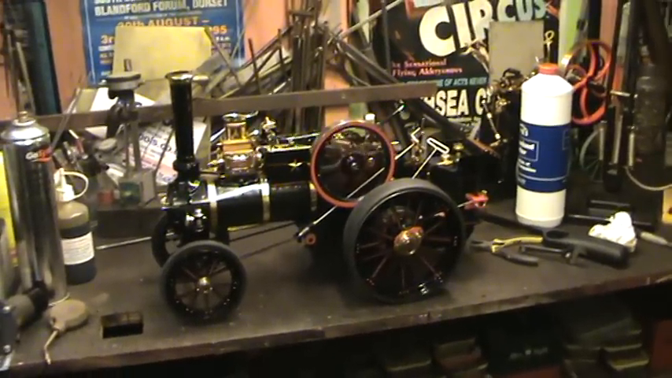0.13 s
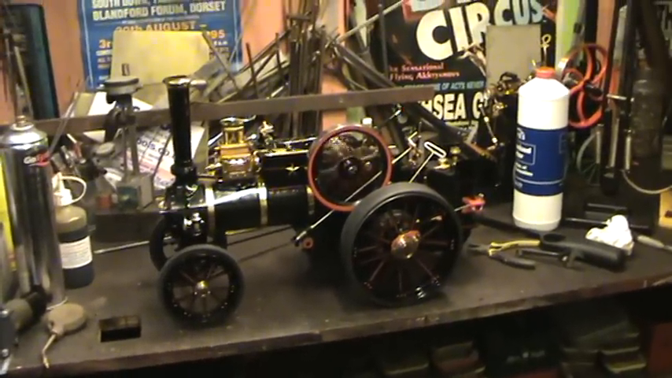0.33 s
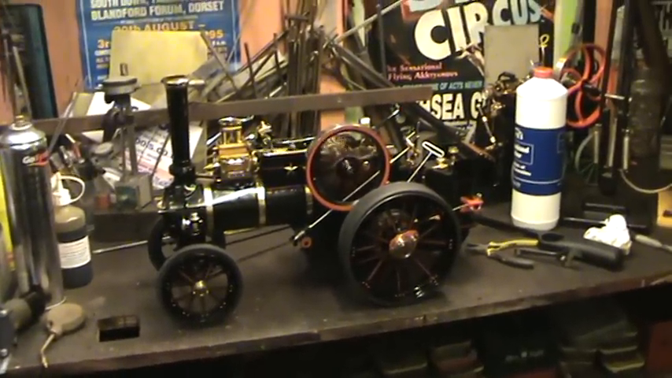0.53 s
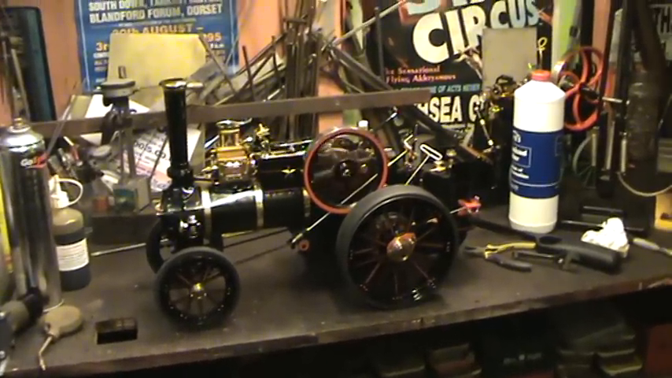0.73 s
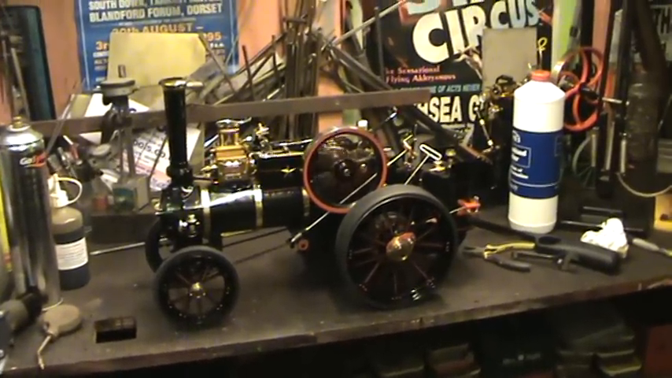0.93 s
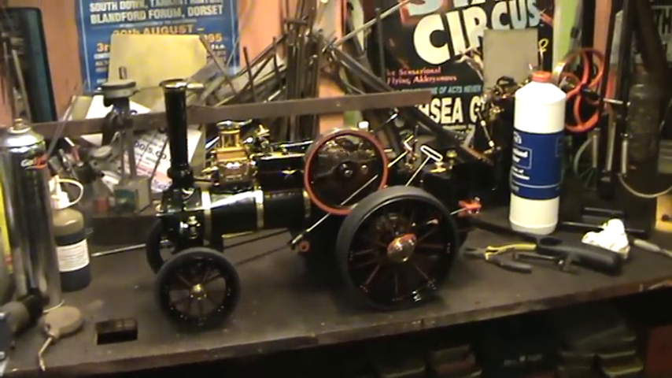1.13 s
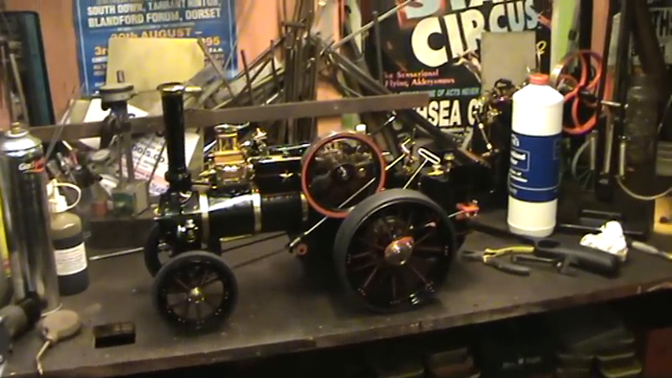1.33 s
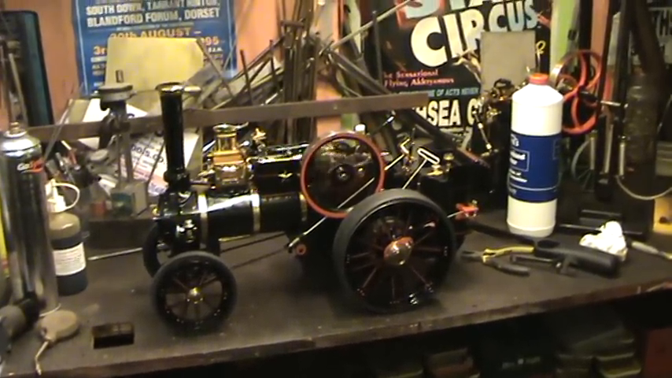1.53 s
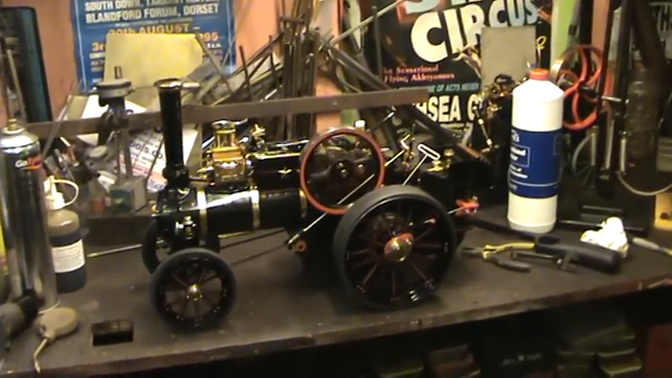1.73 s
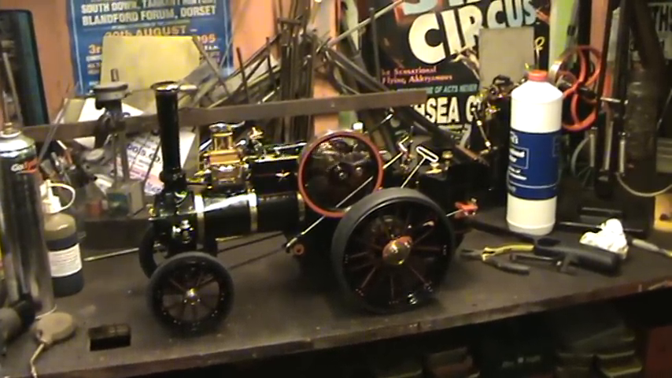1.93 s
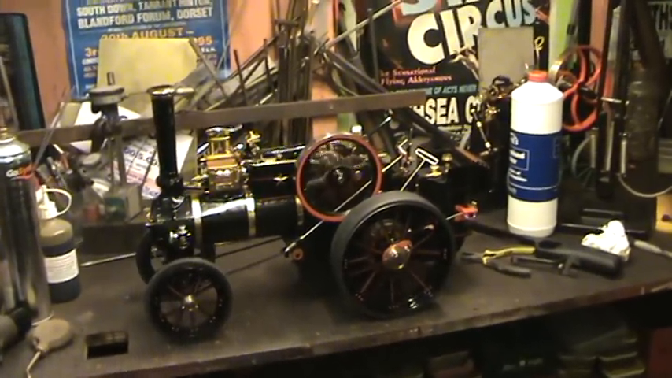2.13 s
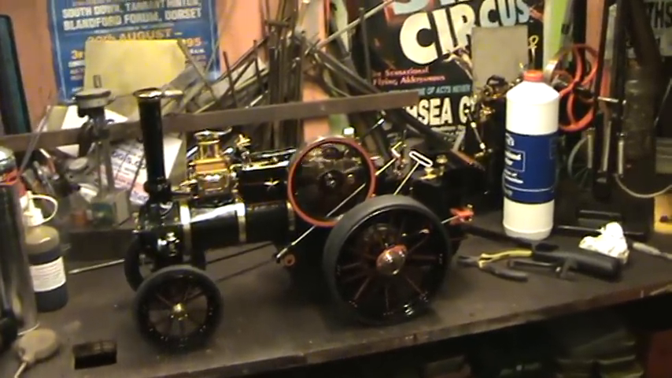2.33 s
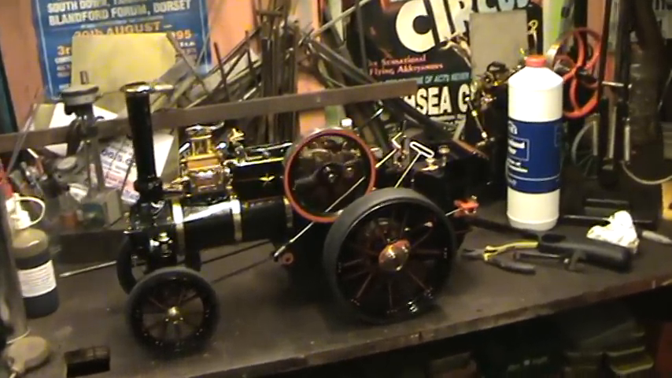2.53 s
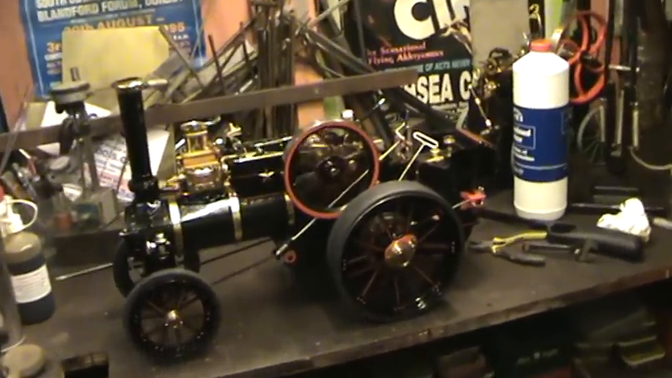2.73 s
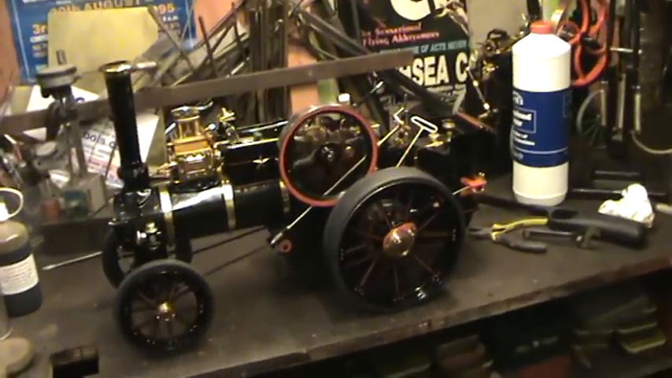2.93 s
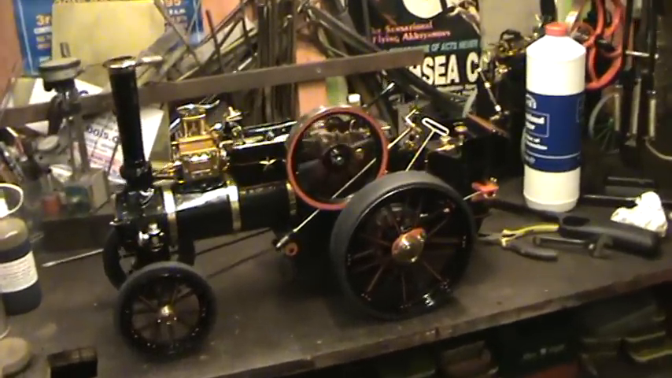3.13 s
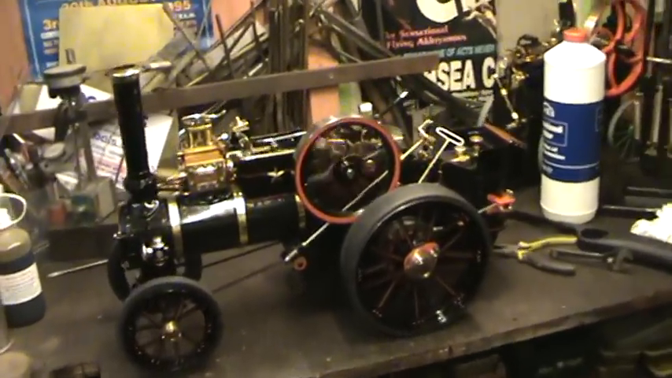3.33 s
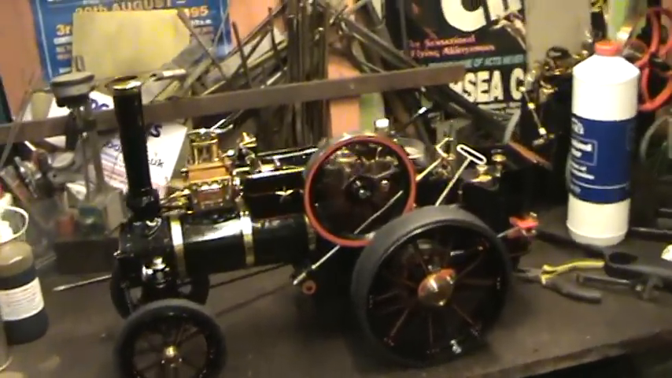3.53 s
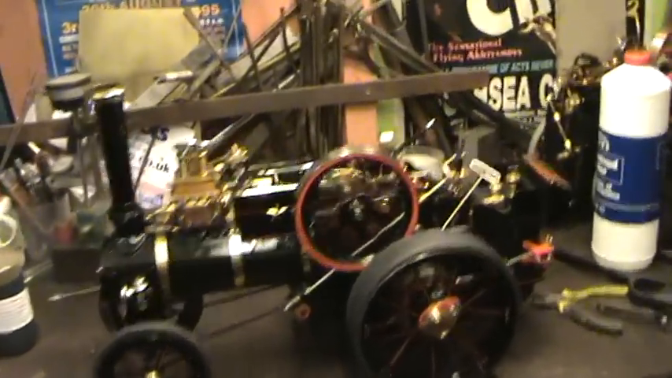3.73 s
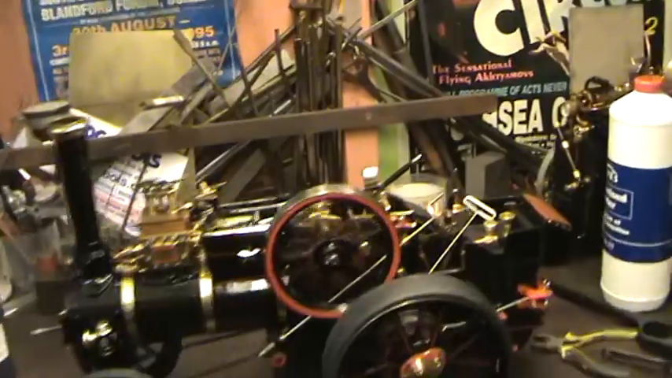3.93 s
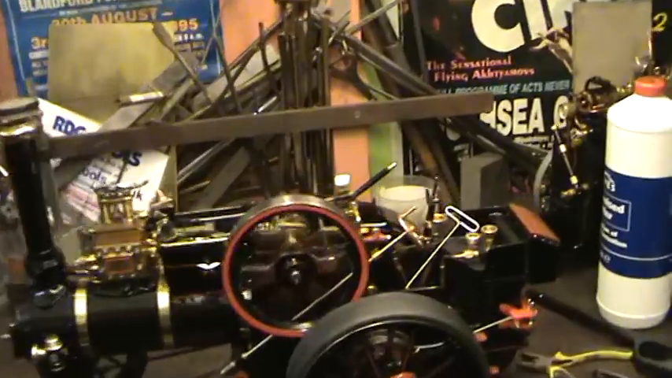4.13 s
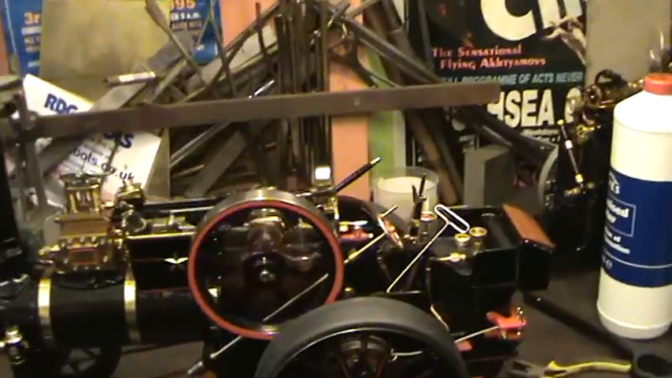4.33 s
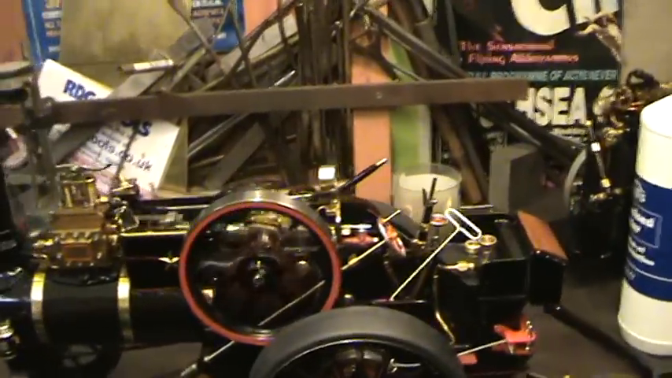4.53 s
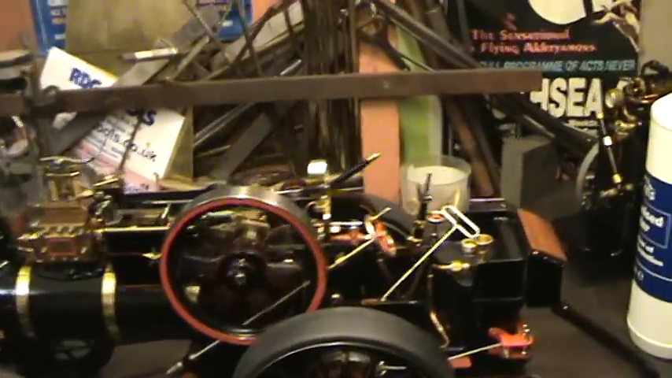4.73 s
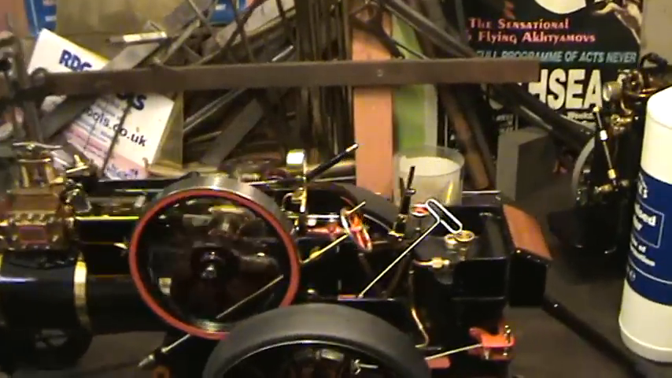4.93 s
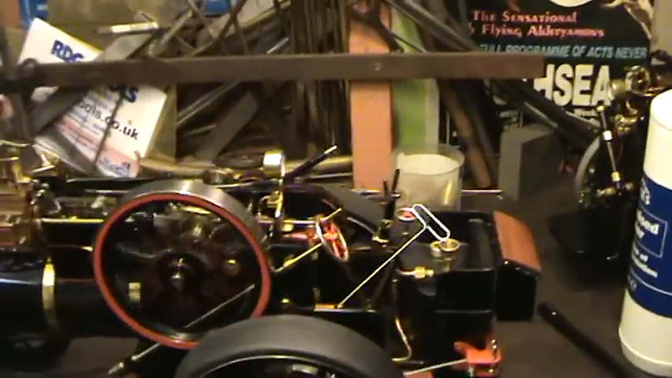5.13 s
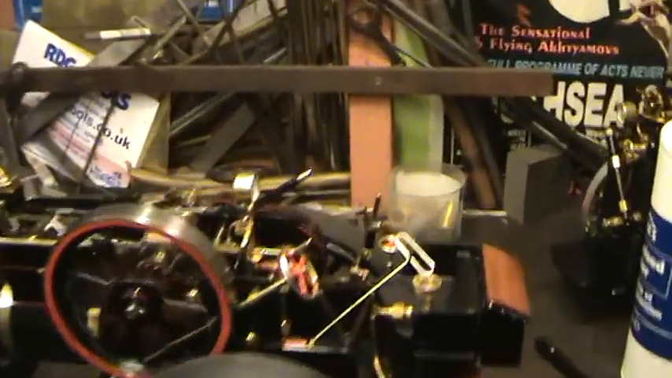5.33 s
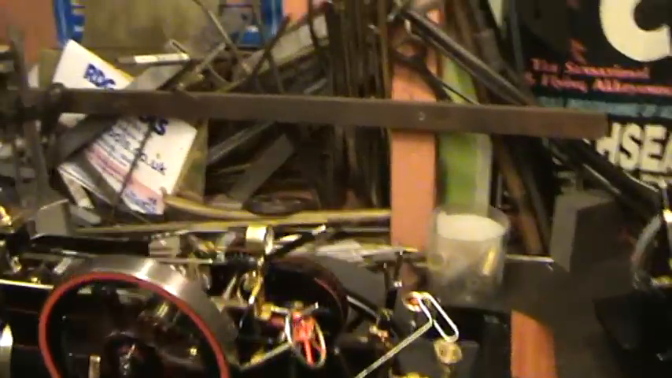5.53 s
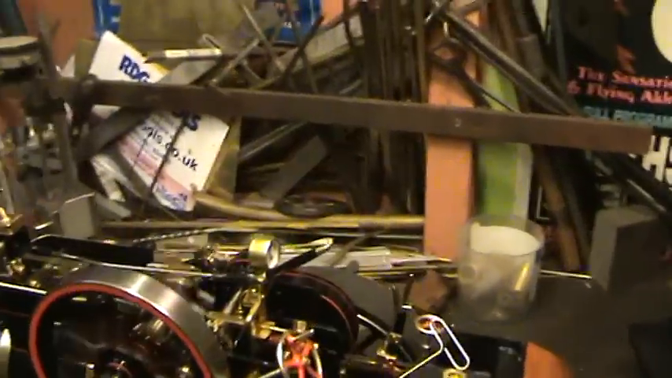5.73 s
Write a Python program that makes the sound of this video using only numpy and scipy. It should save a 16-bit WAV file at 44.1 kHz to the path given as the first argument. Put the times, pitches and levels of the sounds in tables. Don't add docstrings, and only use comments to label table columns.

```python
import sys
import numpy as np
from scipy import signal
from scipy.fft import rfft, irfft, next_fast_len
from scipy.io import wavfile
from scipy.ndimage import uniform_filter1d

SR = 44100
rng = np.random.default_rng(int(sys.argv[2]) if len(sys.argv) > 2 else 0)


def how_loud(loudness_db):
    steps = np.asarray(loudness_db, float) / 20
    return 10 ** steps


def file_out(sig):
    cols = np.atleast_2d(sig).T
    lim = np.clip(cols, -1, 1)
    pcm = np.round(lim * 32767).astype(np.int16)
    wavfile.write(sys.argv[1], SR, pcm)


N = 254456

# (time [s], speed [turns/s])
SPEED = [(0, 6.1223), (.9, 6.2008), (1.25, 6.0893), (1.9, 6.2697), (2.7, 6.2161), (3.5, 6.3336),
         (4.1, 6.2026), (4.6, 5.9887), (5.77, 6.2298)]
FIRST_BEAT_TURN, RETURN_BEAT_TURN = .0067, .474
STROKES = {"bench": (-44.5, -45.5, 3.5, 3.5, 2, 0.1), "chimney": (-30.5, -36, 12.5, 15, 1, 0.4),
           "puff": (-36.5, -30.5, -2, -3.5, 1.5, 2.3), "knock": (-37.5, -33, 10.5, 7, 0.66, 0.5),
           "boiler": (-47.5, -45.5, 6, 4, 11.5, 1.3)}

# (time [s], distance walked [m])
WALK = [
    (0, 0),
    (2.0, .004),
    (2.5, .06),
    (3.4, .2),
    (4.3, .55),
    (5.77, .8),
]
# (time [s], closeness [0-1], facing the boiler [0-1], gain in the high jet's beam [dB])
CAMERA = [(0, 0, 0, 0), (1.5, 0.27, 0.13, 0.2), (2.25, 0.36, 0.47, 0.1), (2.5, 0.53, 0.57, 0.6),
          (3.3, 0.57, 1, 0.7), (3.7, 0.69, 0.6, 0.1), (3.95, 0.7, 0.9, 0.5), (4.4, 0.76, 0.86, -1.1),
          (4.8, 0.94, 0.54, -0.4), (5.2, 0.83, 0.2, 0), (5.77, 0.9, 0.6, 1)]

# (frequency [Hz], delay [s], rise [s], T60 [s], level [dB])
BENCH_MODES = [(120.7, 0.0038, 0.0045, 0.12, 4), (94.5, 0.0034, 0.0089, 0.079, -7),
               (148, 0.0083, 0.0058, 0.28, -12)]
BENCH_NEAR_MODES = [(126, -.006, 0.0052, 0.061, 6.7), (88.5, -0.0038, 0.0057, 0.059, 6.1)]
CHIMNEY_MODES = [(331, -.004, 0.013, 0.125, 3), (245, -.002, 0.0079, 0.06, -12)]
CHIMNEY_NEAR_MODES = [(321.5, -.001, 0.0067, 0.039, 9), (242, -0.00086, 0.0042, 0.016, -10),
                      (324, .010, 0.0041, 0.06, -12.5)]
PUFF_MODES = [(340.2, 0.017, 0.018, 0.15, -0.5), (246, 0.0222, 0.0088, 0.062, -4.5)]
PUFF_NEAR_MODES = [(325, 0.01783, .007, 0.055, 14), (333, .034, .007, 0.037, 6.5),
                   (250, .03, 0.011, 0.1, -1)]
KNOCK_MODES = [(773, 0.021, 0.004, 0.03, 2.5), (926, .028, 0.004, 0.055, -5.5),
               (762, 0.031, 0.009, 0.06, -8), (1357, .015, 0.005, 0.05, -8)]
KNOCK_NEAR_MODES = [(850, .020, .005, .028, 10), (780, .031, .004, .032, 6), (720, .036, .005, .04, -3),
                    (1500, .021, .004, .035, -2)]
BOILER_MODES = [(670, .016, 0.012, 0.33, -4), (609, .03, 0.0064, 0.1, -8)]

# (frequency [Hz], density [dB/Hz])
JET_SPECTRUM = [(4410, -10.5), (7500, -6), (8430, -6.5), (9290, 3), (9950, 3), (10700, -1.5), (13000, -19),
                (14200, -32)]
FLOW_SPECTRUM = [(1290, -63), (2200, -12.5), (2650, -5), (2950, -7), (3920, -2), (5080, -4), (5530, 0),
                 (8500, -5.5), (11000, -22), (18700, -120)]
# (frequency [Hz], density [dB/Hz])
LOWER_FAR_SPECTRUM = [(26, -36), (45, -14), (129, -11.5), (194, -12.5), (333, -1.5), (423, -12.5),
                      (704, -8), (939, -11), (1110, -20), (1340, -4), (1760, -10), (2600, -3.5),
                      (3380, -46), (5720, -120)]
LOWER_NEAR_SPECTRUM = [(26, -42), (45, -5), (114, -11), (184, -14), (322, -2), (484, -17), (753, -12),
                       (1080, -16.5), (1390, -11), (2600, -12), (3380, -24), (5720, -120)]
# (frequency [Hz], density [dB/Hz])
AIR_SPECTRUM = [(7650, -33), (13000, -17), (13700, -11), (15100, 9), (15700, 5)]
# (frequency [Hz], density [dB/Hz])
SIDES_SPECTRUM = [(240, -54), (400, -16.5), (759, -17), (1060, -15.5), (1380, -13), (1920, -20.5),
                  (2610, -9.5), (2950, -15), (3760, -8), (4880, -13.5), (5510, -11), (7590, -19),
                  (11100, 3), (12500, -5), (15300, -27)]
AIR_DB, SIDES_DB = -45.5, -31
# (from afar [dB], gain when close [dB])
JET_DB = (-26.5, 3)
FLOW_DB = (-29, 6)
LOWER_DB = (-41, 3)
# (frequency [Hz], width [Hz], far level [dB], near level [dB])
CAVITIES = [(4026, 100, -15, -19), (4413, 70, -9.5, -19), (5570, 360, -9, -10), (3885, 195, -16.5, -12),
            (5500, 190, -16, -17.5), (10500, 170, -6, -17), (9480, 75, -22.5, -19), (11770, 61, -20.5, -32),
            (9380, 140, -9, -18), (9760, 100, -10, -31)]
# (time [s], level [dB])
WHISTLE = [(0, -40.5), (1.9, -38), (2.45, -39.5), (2.9, -34), (3.58, -28.5), (3.7, -40), (4.2, -38),
           (4.6, -30), (5.05, -37.5), (5.3, -39), (5.77, -40.5)]
# (time [s], gain [dB])
SPURTS = [
    (.98, 6.6),
    (1.37, 10.2),
    (1.7, 3.5),
    (2.18, 7.1),
    (2.99, 6),
    (4.43, 6.2),
    (4.85, 8.1),
    (5.18, 17),
    (5.74, 9.4),
]
SPURT_S, WHISTLE_FAR_HZ, WHISTLE_NEAR_HZ = 0.024, 2700, 2631

# (centre [s], length [s], level [dB])
HUM = [(.13, .7, -41), (.66, 0.45, -40), (1.12, 0.44, -45.5), (1.55, 0.55, -44), (1.98, 0.18, -46),
       (2.3, .45, -48), (2.62, .45, -45), (3.25, .75, -48), (4.15, 0.46, -48), (4.52, 0.39, -51),
       (4.9, .4, -52), (5.35, .5, -49), (5.72, .25, -42)]
HUM_HZ, HUM_WIDTH_HZ = 62, 1.37

# (time [s], level [dB])
HANDS = [(0, -64), (2.0, -61), (2.9, -58), (3.4, -51), (3.75, -51), (4.3, -51), (4.8, -53), (5.5, -53),
         (5.7, -49), (5.77, -61)]
# (frequency [Hz], density [dB/Hz])
GRIP_SPECTRUM = [(70, -20), (160, -5), (300, -5), (700, -12), (1200, -25)]
# (time [s], frequency [Hz], level [dB])
CREAK = [
    (3.5, 660, -70),
    (3.6, 650, -52),
    (3.72, 630, -37),
    (3.85, 570, -41),
    (3.92, 560, -70),
]
# (centre [s], length [s], level [dB])
PLATE = [
    (2.55, 0.55, -46.5),
    (2.85, .18, -46),
    (3.68, .3, -41),
    (3.81, .13, -37),
    (4.05, .5, -47),
]
PLATE_HZ = 879.5

SHED_T60_S, SHED_DB, SHED_SIDE_DB = 0.15, -7.5, -20
NEAR_ECHO_LATE = 3.5

T = np.arange(N) / SR
NEAR = np.clip(np.interp(T, *np.transpose(WALK)) / .6, 0, 1)
MOVED = np.clip(NEAR / .13, 0, 1)


def curve(table, col):
    return np.interp(T, [row[0] for row in table], [row[col] for row in table])


def unit(x):
    return x / np.sqrt(np.mean(x ** 2))


def coloured(points):
    size = next_fast_len(N)
    hz = np.maximum(np.fft.rfftfreq(size, 1 / SR), 1)
    points_hz, points_db = np.transpose(points)
    db = np.interp(np.log(hz), np.log(points_hz), points_db, -120, -120)
    spectrum = rfft(rng.standard_normal(size)) * how_loud(db)
    return unit(irfft(spectrum, size)[:N])


def resonant(hz, width_hz):
    b, a = signal.iirpeak(hz, hz / width_hz, SR)
    once = signal.lfilter(b, a, rng.standard_normal(N))
    return unit(signal.lfilter(b, a, once))


def flicker(rate_hz, db):
    hold = int(SR / rate_hz)
    steps = np.repeat(rng.standard_normal(N // hold + 1), hold)
    smooth = uniform_filter1d(uniform_filter1d(steps, hold), hold)[:N]
    return how_loud(1.63 * db * smooth)


def surges(rows):
    return sum(how_loud(db) * np.cos(np.pi * np.clip((T - at) / length, -.5, .5)) for at, length, db in rows)


def blend(far, near, late=1):
    angle = NEAR ** late * np.pi / 2
    return np.cos(angle) * far + np.sin(angle) * near


def beats():
    turns = np.cumsum(np.interp(T, *np.transpose(SPEED))) / SR - FIRST_BEAT_TURN
    marks = (np.arange(int(turns[-1]) + 1)[:, None] + [0, RETURN_BEAT_TURN]).ravel()
    return np.searchsorted(turns, marks[marks < turns[-1]])


def strength(part):
    forward, back, forward_gain, back_gain, facing, scatter = STROKES[part]
    at = beats()
    is_back = np.arange(len(at)) % 2
    db = np.where(is_back, back, forward)
    db = db + np.where(is_back, back_gain, forward_gain) * curve(CAMERA, 1)[at]
    return db + facing * curve(CAMERA, 2)[at] + scatter * rng.standard_normal(len(at))


def strikes(db, shape):
    train = np.zeros(N)
    train[beats()] = how_loud(db)
    lead = SR // 20
    response = shape(np.arange(-lead, SR // 2) / SR)
    return signal.fftconvolve(train, response)[lead:lead + N]


def swell(t, delay_s, rise_s, t60_s):
    t = np.maximum(t - delay_s, 0)
    return (1 - np.exp(-(t / rise_s) ** 2)) * np.exp(-np.log(1000) * t / t60_s)


def ring(beat_db, modes):
    def shape(t):
        total = 0
        for hz, delay_s, rise_s, t60_s, db in modes:
            sine = np.sin(2 * np.pi * hz * (t - delay_s))
            total = total + how_loud(db) * swell(t, delay_s, rise_s, t60_s) * sine
        return total
    return strikes(beat_db, shape)


def burst(beat_db, delay_s, rise_s, t60_s, hz, width_hz):
    gate = strikes(beat_db, lambda t: swell(t, delay_s, rise_s, t60_s))
    return gate * resonant(hz, width_hz)


def bench_thump():
    db = strength("bench")
    return how_loud(6.5) * blend(ring(db, BENCH_MODES), ring(db, BENCH_NEAR_MODES))


def chimney_ring():
    db = strength("chimney")
    return how_loud(0.5) * blend(ring(db, CHIMNEY_MODES), ring(db, CHIMNEY_NEAR_MODES), NEAR_ECHO_LATE)


def exhaust_puff():
    db = strength("puff")
    tone = how_loud(1) * blend(ring(db, PUFF_MODES), ring(db, PUFF_NEAR_MODES), NEAR_ECHO_LATE)
    return tone + burst(db, .003, 0.011, 0.27, 326, 43) * how_loud(-14)


def valve_knock(db):
    knock = how_loud(4.0) * blend(ring(db, KNOCK_MODES), ring(db, KNOCK_NEAR_MODES))
    return knock + burst(db, 0.017, 0.0022, 0.16, 747, 540) * how_loud(-9)


def steam_spit(db):
    return burst(db, 0.014, 0.008, 0.12, 1710, 1900) * how_loud(.6)


def boiler_ring(db):
    return how_loud(2.0) * ring(db, BOILER_MODES) + burst(db, .015, .01, .2, 668, 40) * how_loud(-7)


def boiler_breath(db):
    return burst(db, 0.0013, 0.0048, 0.28, 1407, 170) * how_loud(-4.0)


def exhaust():
    knock_db, boiler_db = strength("knock"), strength("boiler")
    deep = bench_thump() + chimney_ring() + exhaust_puff()
    deep = deep + boiler_breath(boiler_db) + steam_spit(knock_db)
    gear = valve_knock(knock_db) + boiler_ring(boiler_db)
    return deep, gear


def leak_db(levels):
    return levels[0] + levels[1] * curve(CAMERA, 1)


def high_jet():
    db = leak_db(JET_DB) + 1.7 * curve(CAMERA, 3) + 0.14
    return coloured(JET_SPECTRUM) * how_loud(db) * flicker(12, 0.34) * flicker(4.2, .25)


def cavity_tones():
    total = 0
    for hz, width_hz, far_db, near_db in CAVITIES:
        level = how_loud(far_db + (near_db - far_db) * MOVED)
        total = total + level * resonant(hz, width_hz) * flicker(14, 1.5)
    return total


def low_leak(pressure):
    noise = blend(coloured(LOWER_FAR_SPECTRUM), coloured(LOWER_NEAR_SPECTRUM))
    return noise * how_loud(leak_db(LOWER_DB) - 1.0) * (1 + 1.05 * pressure)


def whistling_leak(pressure):
    tone = blend(resonant(WHISTLE_FAR_HZ, 78), resonant(WHISTLE_NEAR_HZ, 62)) * unit(0.043 + pressure)
    spurts_db = sum(db * np.exp(-((T - at) / SPURT_S) ** 2) for at, db in SPURTS)
    return tone * how_loud(curve(WHISTLE, 1) + spurts_db - 4.0) * flicker(12, 0.62)


def leaks():
    pressure = strikes(0, lambda t: swell(t, -0.019, 0.015, 0.2))
    flow = how_loud(leak_db(FLOW_DB) - 1.02) * flicker(16, 0.11) * flicker(8, 0.5)
    jets = high_jet() + coloured(FLOW_SPECTRUM) * flow
    pipes = cavity_tones() * unit(.7 + pressure) * flow
    air = coloured(AIR_SPECTRUM) * how_loud(AIR_DB)
    return jets, pipes + low_leak(pressure) + whistling_leak(pressure) + air


def echoes(x, longest_s, db, count):
    walked_m, out = curve(WALK, 1), 0
    for lag, slope, sign in rng.random((count, 3)):
        delay_s = longest_s * (.1 + lag) + walked_m * (slope - .5) / 343
        out = out + np.sign(sign - .5) * np.interp(T - delay_s, T, x, left=0)
    return out * how_loud(db) / np.sqrt(count)


def side_hiss():
    wide = coloured(SIDES_SPECTRUM) * how_loud(SIDES_DB + 5.5 * curve(CAMERA, 1) - 2.0)
    wide = wide + echoes(wide, .012, -11.0, count=4)
    return wide - 0.19 * uniform_filter1d(wide, size=5)


def shed(x, db):
    t = np.arange(SR // 2) / SR
    tail = rng.standard_normal(len(t)) * swell(t, 0.0021, 0.0019, SHED_T60_S)
    return how_loud(db) * signal.fftconvolve(x, tail / np.sqrt(np.sum(tail ** 2)))[:N]


def motor_hum():
    drift = np.cumsum(np.log(flicker(3, 8.36))) * 2 * np.pi * HUM_WIDTH_HZ / SR
    return surges(HUM) * how_loud(1.5) * np.sin(2 * np.pi * HUM_HZ * T + drift)


def hands():
    rumble = coloured(GRIP_SPECTRUM) * how_loud(curve(HANDS, 1) - 1.0) * flicker(25.33, 3)
    creak = np.sin(2 * np.pi * np.cumsum(curve(CREAK, 1) * flicker(60, 0.274)) / SR)
    return rumble + creak * how_loud(curve(CREAK, 2)) * flicker(30, 3)


def loose_plate():
    return resonant(PLATE_HZ, 16) * surges(PLATE) * how_loud(-3.5)


def scene():
    deep, gear = exhaust()
    gear = gear + loose_plate()
    jets, hiss = leaks()
    jets = (jets + echoes(jets, .016, -5.5, count=12) * (1 - 0.093 * NEAR)) * how_loud(-0.27)
    mid = deep + gear + shed(deep + gear, SHED_DB) + jets + hiss + motor_hum()
    room = 2.8 * np.gradient(gear) + shed(gear + deep, SHED_SIDE_DB)
    side = side_hiss() + room + hands()
    side = side + 0.029 * deep + .06 * gear + 0.075 * hiss
    side = side - 0.05 * jets + 0.18 * np.gradient(jets)
    return np.array([mid + side, mid - side])


def low_pass(x):
    return signal.sosfilt(signal.butter(12, 15830, fs=SR, output="sos"), x)


def record(dry):
    low_cut = signal.butter(2, 45, "high", fs=SR, output="sos")
    top_cut = signal.ellip(10, .3, 70, 15760, fs=SR, output="sos")
    mix = signal.sosfilt(top_cut, signal.sosfilt(low_cut, dry))
    return low_pass(mix)


dry = scene()
out = record(dry)
file_out(out)
```